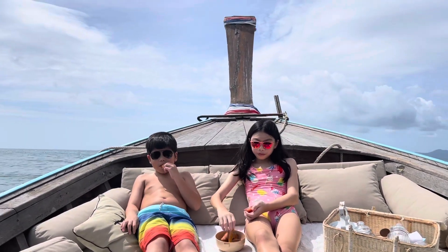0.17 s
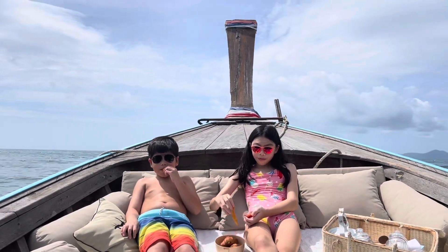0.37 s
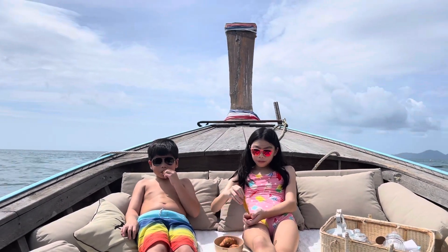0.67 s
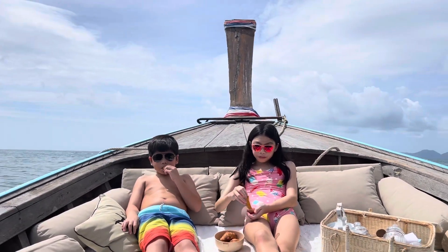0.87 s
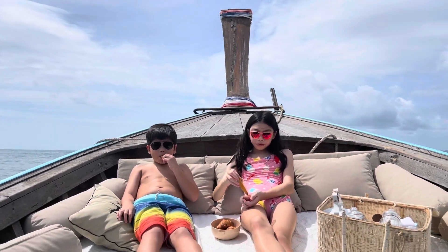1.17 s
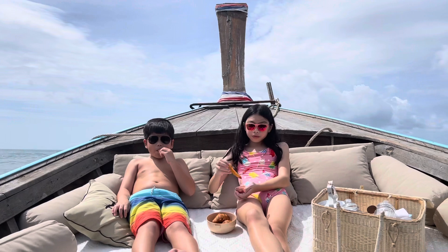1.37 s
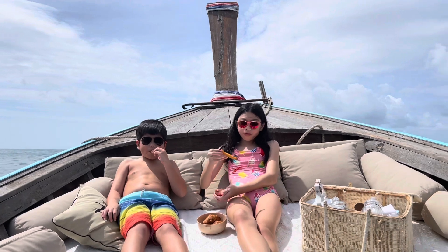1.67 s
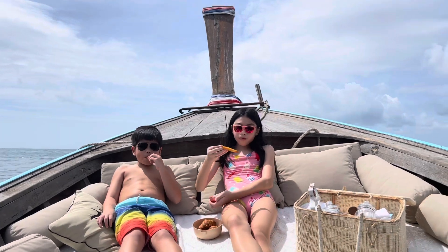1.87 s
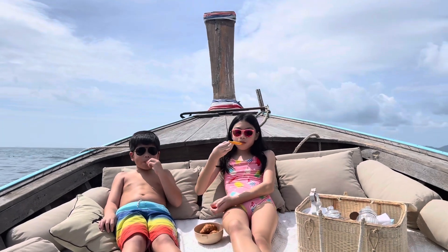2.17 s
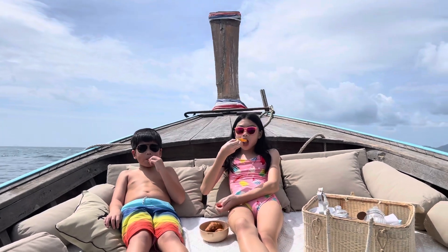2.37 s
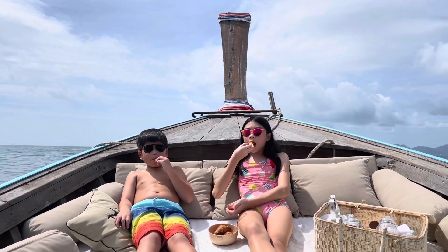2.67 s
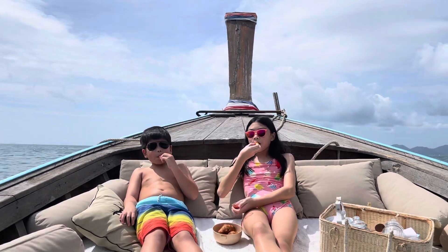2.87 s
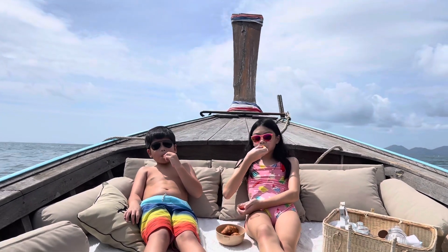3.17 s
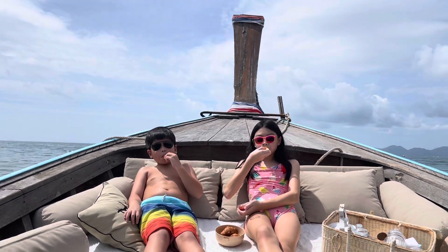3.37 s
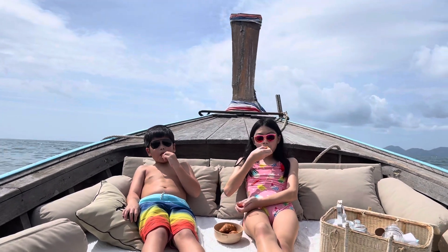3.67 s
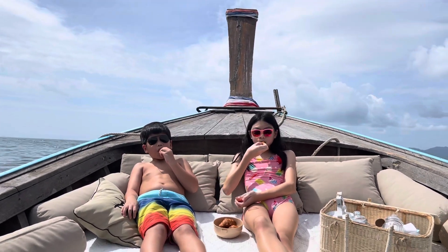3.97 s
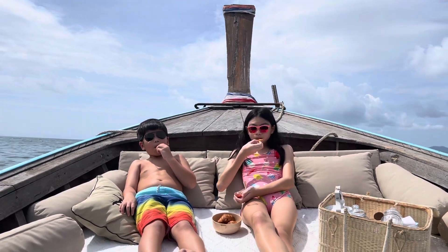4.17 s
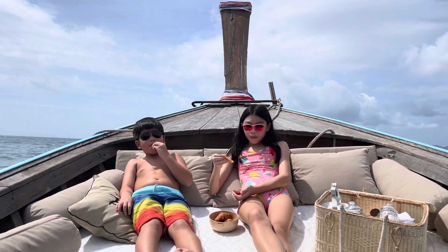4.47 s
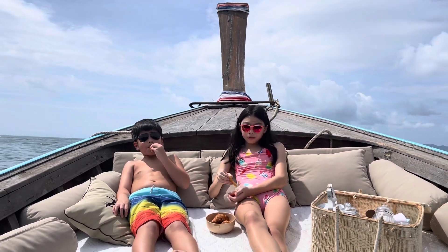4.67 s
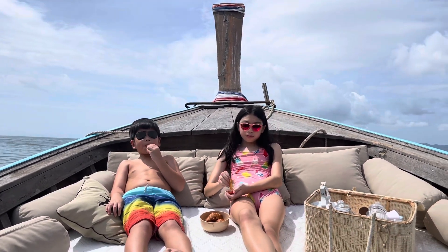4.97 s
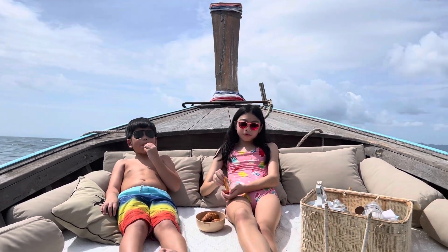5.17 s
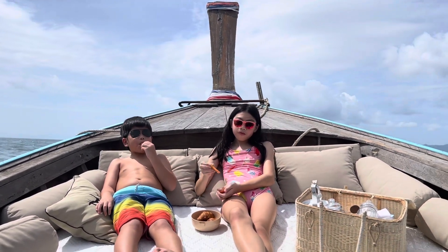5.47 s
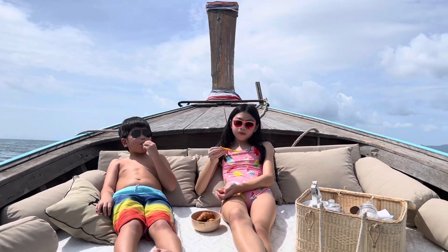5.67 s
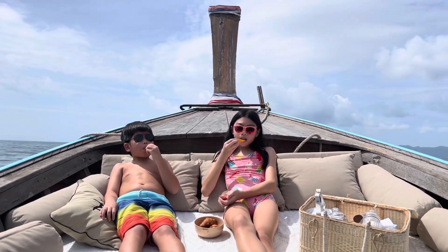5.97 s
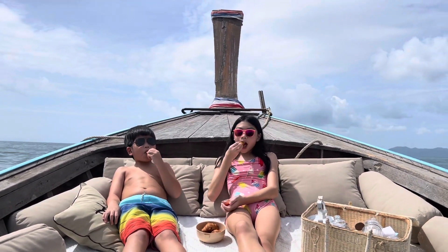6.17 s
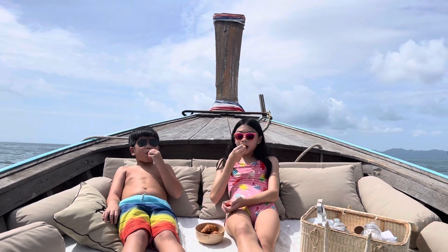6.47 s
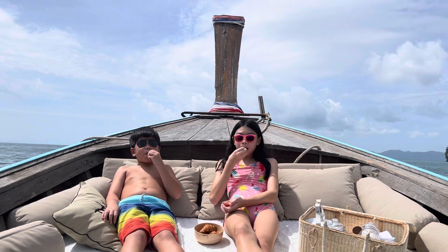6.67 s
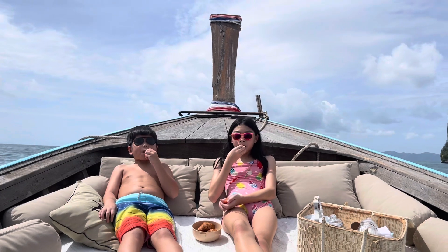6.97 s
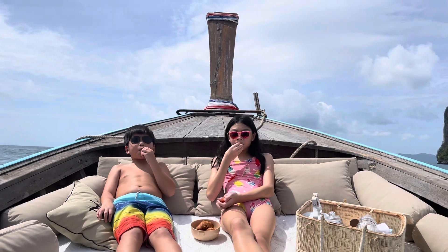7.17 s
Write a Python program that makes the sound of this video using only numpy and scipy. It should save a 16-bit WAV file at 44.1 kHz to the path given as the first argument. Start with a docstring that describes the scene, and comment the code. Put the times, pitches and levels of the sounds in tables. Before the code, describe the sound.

A diesel boat engine drones and clatters steadily while wind buffets the microphone, water slaps and knocks the wooden hull, and a thin whistle rises and sinks.

```python
"""A long-tail boat cruises over open water, heard from near the bow by two microphone ports.
Throughout, wind noise buffets in lumps, droplet hiss swells at the bow, and a four-cylinder diesel gives
shaft-locked tones, noisy clatter, ringing fittings, a gear whine and a rough turbocharger whistle.
In the first second and a half damped knocks and noisy slaps crowd the hull; they return from about 3 to 5 s.
The whistle and shaft climb to a peak just after 5 s, then both sink to the end, with one last knock near 7 s."""
import sys
import numpy as np
from scipy import signal
from scipy.fft import rfft, irfft
from scipy.io import wavfile
from scipy.ndimage import uniform_filter1d

SR = 44100
rng = np.random.default_rng(int(sys.argv[2]) if len(sys.argv) > 2 else 0)


def to_wav(s):
    """Save 16-bit WAV."""
    ch = np.atleast_2d(s).T  # columns
    pcm = np.round(np.clip(ch, -1, 1) * 32767)  # PCM
    wavfile.write(sys.argv[1], SR, pcm.astype(np.int16))


N = 323253
T, FREQS = np.arange(N) / SR, np.fft.rfftfreq(N, 1 / SR)

# Levels are set before each layer's own trim; colours are relative, per Hz.
# head wind: start_s, level_db, left_minus_right_db
BREEZE_CURVE = [(0, -18.5, -1), (1.6, -18, 0), (1.88, -19, 0.5), (2.2, -20, -2), (3.15, -18.5, -0.5),
                (3.5, -19, 1), (3.95, -22.5, -1), (4.6, -19.5, 1.5), (5.1, -22.5, 1), (5.55, -25, 0),
                (6.1, -20.5, 0), (6.7, -26.5, -2), (7.33, -17.5, -1)]
# gusts on top of the breeze: peak_s, lift_db, length_s
WIND_GUSTS = [(0.52, 4, 0.1), (1.09, 1.5, 0.051), (1.22, 3.5, 0.23), (2.72, 1.5, 0.14), (3.335, 2, 0.058),
              (4.17, 5, 0.12), (4.33, 4, 0.12), (4.86, 4, 0.22), (6.01, 2, 0.087), (7.213, 3, 0.22)]
# wind colour: pitch_hz, level_db
WIND_COLOUR = [(15, -35), (27, -39), (38, -8), (65, 3), (110, -4), (170, -3.5), (250, -9), (400, -18),
               (700, -24.5), (1200, -34.5), (3000, -56), (9000, -85)]
# wind between the ports: pitch_hz, likeness_0_to_1, left_lead_rad, left_minus_right_db
WIND_STEREO = [(50, 0.43, 0, -0.45), (128, 0.026, 0.01, -0.33), (300, 0.015, 0.013, -0.61),
               (597, 0.021, 0, 0.87)]
# the bow cuts a wave: peak_s, level_db, swell_and_fade_s
BOW_SPLASHES = [(.03, -45.5, 0.33), (.29, -45, 0.28), (.9, -45, 0.14), (1.3, -40, 0.22), (1.53, -43.5, .1),
                (2.82, -38.5, 0.17), (5.48, -45, 0.37), (6.58, -49.5, 0.19), (6.94, -47, .03),
                (7.3, -45, 0.11)]
# spray colour: pitch_hz, level_db
SPRAY_COLOUR = [(300, -10), (1500, 1), (3000, 2), (4500, .5), (6500, -1), (8000, -.7), (9700, 2.3),
                (11200, 1), (11800, -3.5), (12700, -13)]
# stereo spread of the spray hiss, nearly alike left and right in the top treble, its phase turning
# with pitch: pitch_hz, likeness_0_to_1, left_lead_rad, left_minus_right_db
SPRAY_SPREAD = [(1000, .3, .5, 0), (4000, .3, .6, 1.7), (5000, .15, 1.5, 2), (6600, .4, 0, 3),
                (7400, .45, .9, 2.6), (8400, .95, 0, 0), (8850, .9, -.2, 0), (9750, .97, -2.6, 0),
                (10400, .97, -3.4, 0), (11200, .9, -5.1, 0), (12000, .97, -6.2, 0)]
# water churns along the hull: peak_s, level_db, length_s
HULL_CHURNS = [(0.096, -37.5, 0.3), (0.517, -32, 0.09), (0.666, -26.5, 0.085), (.755, -27, 0.039),
               (0.82, -32, 0.036), (0.925, -31, 0.037), (1.225, -32, 0.17), (2.256, -30, 0.11),
               (2.986, -30.5, 0.32), (3.336, -36, 0.12), (4.326, -26, .09), (4.84, -37, 0.11),
               (5.4, -38, 0.73)]
# churn colour: pitch_hz, level_db
CHURN_COLOUR = [(150, -24), (330, -1), (560, 6.5), (850, 4), (1200, -9), (2500, -35)]
# wave knocks on the hull: start_s, peak_db, pitch_hz, fall_by_60_db_s
HULL_KNOCKS = [(0.369, -10.5, 364, 0.084), (0.419, -7.5, 162, 0.055), (0.453, -12, 293, 0.074),
               (.486, -17, 395, 0.036), (0.503, -22, 260, 0.028), (0.531, -5, 150, .035),
               (0.645, -8.5, 145, .035), (.666, -14, 460, 0.03), (0.737, -7.5, 277, 0.04),
               (0.797, -9, 262, 0.094), (.903, -7.5, 215.5, 0.036), (1.085, -5, 134, .04),
               (1.133, -10, 674, 0.024), (1.138, -2.5, 370, 0.03), (1.192, -12, 503, 0.026),
               (1.2, -5.5, 200, 0.05), (1.229, -8, 600, 0.011), (1.244, 0.5, 123, 0.067),
               (1.271, -12, 526, 0.021), (1.304, -6, 170, 0.027), (1.934, -9, 151, 0.03),
               (3.118, -5, 95, 0.04), (3.225, -6, 169, .022), (3.307, -3.5, 136, 0.064),
               (3.338, -4.5, 187, 0.022), (3.536, -3.5, 134, 0.029), (3.562, -9, 165, 0.017),
               (3.593, -4, 189, 0.025), (3.629, -6, 246, 0.018), (3.637, -2, 129, 0.031),
               (3.666, -3, 88.2, 0.043), (4.171, -3, 104, 0.059), (4.229, -4, 159, 0.024),
               (4.266, -4, 130, .022), (4.314, -16, 500, 0.035), (4.32, -6, 287, 0.042),
               (4.335, -2, 125, 0.025), (4.382, -8, 135, 0.03), (4.723, -5.5, 190, 0.026),
               (4.793, -2.5, 135, 0.051), (4.818, -6, 268, 0.042), (4.897, -9, 94, 0.078),
               (7.05, -10.5, 298, 0.03)]
# one tiny bright tick: start_s, peak_db, pitch_hz, fall_by_60_db_s
BRIGHT_TICK = (4.705, -22.5, 12000, .002)
# turbocharger, spooling more slowly than the shaft: start_s, pitch_hz, level_db, tone_against_hiss_0_to_1
TURBO_CURVE = [(0, 5290, -52, .4), (.26, 5240, -48, .6), (.48, 5440, -42.5, 0.6), (.68, 5460, -43, .55),
               (.9, 5470, -52.5, .3), (1.4, 5450, -51, .2), (1.8, 5400, -49, 0.72), (2.2, 5640, -48, .15),
               (2.6, 5720, -49, .15), (3.5, 5700, -48, 0.15), (4.05, 5780, -47, 0.35),
               (4.45, 5800, -40, 0.6), (4.78, 5880, -44, .3), (5.0, 5960, -39.5, 0.6),
               (5.35, 5880, -39, 0.58), (5.6, 5830, -41.5, .45), (5.95, 5600, -52, .1),
               (6.3, 5450, -46, .15), (6.5, 5400, -45, .8), (6.78, 5410, -43, .9), (7.0, 5360, -51, 0.23),
               (7.15, 5200, -46, .6), (7.33, 5120, -50, .5)]
# steady engine clatter: start_s, level_db
CLATTER_CURVE = [(0, -25.5), (1.3, -25), (1.9, -26), (2.7, -25.5), (3.2, -27), (4.9, -24.5), (5.9, -26),
                 (6.6, -25.5), (7.0, -27.5), (7.33, -25.5)]
# brief clatter surges: peak_s, lift_db, length_s
CLATTER_SURGES = [(.49, 1, 0.059), (.8, 1, 0.075), (1.39, 2, 0.076), (1.985, 2.5, 0.048), (2.81, 2, 0.078),
                  (5.99, 1.5, 0.058)]
# clatter colour: pitch_hz, level_db
CLATTER_COLOUR = [(25, -30), (45, 9.5), (110, 9.5), (200, 4.5), (350, -0.5), (430, -2.5), (900, -4),
                  (1080, -1), (1600, -4.5), (2200, -8), (2800, -11.5), (3700, -22.5), (6500, -23),
                  (9000, -51)]
# resonances of engine block and hull: pitch_hz, width_hz, lift_db
BODY_RESONANCES = [(255, 26, 8.5), (353, 30, 8), (589.5, 31, 6.5), (782, 26, 6.5), (1036, 24, 6),
                   (1115, 17, 6.5), (1330, 24, 1), (1500, 120, 3), (1624, 52, 5), (1895, 52, 4.5),
                   (2060, 50, 0.5)]
# engine between the ports: pitch_hz, likeness_0_to_1, left_lead_rad, left_minus_right_db
ENGINE_STEREO = [(60, 0.82, 0.58, 5), (265, 0.94, 0.1, -3), (454, 0.16, -0.061, 1.5), (800, 0.73, 1.51, -2),
                 (1140, 0.94, 0.86, -1.5), (1720, 0.44, 0.25, -4), (2600, 0.22, 0.87, -2.5),
                 (2880, 0.84, 2.2, 1), (3740, 0.23, -0.46, 2), (6000, 0.9, 1.45, 3.5)]
# the propeller slows and frees itself with the swell: start_s, shaft_hz, firing_tone_db, octave_db
SHAFT_CURVE = [(0, 35.91, -43, -26.5), (.31, 36.77, -19, -32.5), (.85, 38.67, -37, -25.5),
               (1.25, 38.31, -20, -26), (1.53, 37.97, -34, -29), (1.93, 37.15, -14.5, -32.5),
               (2.2, 39.33, -29, -29.5), (2.68, 39.38, -26, -29.5), (3.0, 38.2, -29, -25.5),
               (3.4, 37.94, -23, -25), (3.7, 38.32, -19.5, -27), (4.1, 38.8, -23, -22),
               (4.6, 39.17, -23.5, -28.5), (5.2, 40.46, -25, -30.5), (5.5, 39.86, -25, -27),
               (5.83, 37.71, -27.5, -25), (6.08, 37.19, -20, -28), (6.65, 36.85, -17, -25),
               (7.02, 36.01, -20.5, -27.5), (7.33, 35.5, -15.5, -25.5)]
# exhaust tones swept through hull resonances: shaft_multiple, level_db, resonance_hz, width_hz, lift_db
RESONANT_ORDERS = [(1, -40.5, 39.6, 2.2, 11), (3, -42.5, 119, 12, 17.5), (5, -37, 201, 9.3, 7),
                   (6, -43, 242, 8, 12.5), (7, -45, 260, 17, 12.5)]
# weaker exhaust tones: shaft_multiple, level_db
WEAK_ORDERS = [(2.5, -31), (3.5, -38), (4.5, -39), (5.5, -47), (6.5, -40.5), (7.5, -49.5), (8.5, -49),
               (9, -52), (9.5, -49)]

SPRAY_BETWEEN_DB = -49  # sheets between splashes, before the spray trim
KNOCK_RISE_CYCLES, KNOCK_LEAD_RAD, HULL_TRIM_DB = .36, 1.3, -3
# loose fittings: pitch range, taps a second for each, time to fall by 60 dB
FITTING_LOW_HZ, FITTING_HIGH_HZ, FITTING_TAPS_PER_S, FITTING_RING_S = 720, 2300, 5, .06
FITTINGS_DB, FITTING_LAG_TURNS = -37, .65
FIRING_ORDER = 2  # firings per turn of the shaft
EDGE_HZ = 12750  # upper band limit


def amp(db):
    """Decibels to gain."""
    return 10 ** (np.asarray(db) / 20)


def unit(x):
    """Scales to rms 1, over both channels together."""
    return x / np.sqrt(np.mean(x ** 2) + 1e-20)


def over_time(rows):
    """Each column of a curve table at every sample."""
    s, *columns = np.transpose(rows)
    return [np.interp(T, s, column) for column in columns]


def over_pitch(rows):
    """Each column of a spectrum table at every frequency, on a log pitch scale."""
    hz, *columns = np.transpose(rows)
    return [np.interp(np.log(FREQS + 1), np.log(hz + 1), column) for column in columns]


def swell_shape(s, length):
    """A rounded swell, down to 1/e at half its length to either side."""
    return np.exp(-(2 * (T - s) / length) ** 2)


def swells_db(rows):
    """The summed lift of a table of short, rounded swells."""
    return sum(db * swell_shape(s, length) for s, db, length in rows)


def bell(offset, width):
    """The shape of a resonance: 1 at its centre, a half at half its width to either side."""
    return 1 / (1 + (2 * offset / width) ** 2)


def body_db():
    """The lift that block and hull give each frequency."""
    return sum(db * bell(FREQS - hz, width) for hz, width, db in BODY_RESONANCES)


def drift(hz):
    """Random wander of rms 1, mostly slower than about hz."""
    return unit(irfft(rfft(rng.standard_normal(N)) / (1 + (FREQS / hz) ** 4), N))


def above(x, hz):
    """The part of x above hz, with a soft edge."""
    return irfft(rfft(x) * (1 - 1 / (1 + (FREQS / hz) ** 4)), N)


def stereo_noise(colour_db, spread, source=None):
    """Coloured noise, partly alike left and right, with a phase lead and a level tilt."""
    alike, lead, tilt_db = over_pitch(spread)
    alike = np.clip(alike, 0, 1)
    if source is None:
        source = rng.standard_normal((2, N))
    left, other = rfft(source)
    right = (alike * left + np.sqrt(1 - alike ** 2) * other) * np.exp(-1j * lead)
    pair = np.array([left * amp(tilt_db / 2), right * amp(-tilt_db / 2)])
    return unit(irfft(pair * amp(colour_db), N))


def swirl(x, patchy_db):
    """Moving air lifts and sinks patches of about 100 Hz by 100 ms."""
    z = signal.stft(x, nperseg=2048, noverlap=1536)[2]
    patches = rng.standard_normal(z.shape[1:])
    patches = uniform_filter1d(patches, size=5, axis=0)  # across pitch
    patches = unit(uniform_filter1d(patches, size=10, axis=1))  # across time
    moved = signal.istft(z * amp(patchy_db * patches), nperseg=2048, noverlap=1536)[1]
    return unit(moved[:, :N])


def throb(turns, depth, decay):
    """A gain that jumps at each whole turn and dies away within it."""
    return unit(1 + depth * np.exp(-(turns % 1) / decay))


def whistle(hz, width_hz):
    """A fuzzy line along a pitch curve, different at each port."""
    spin = np.exp(2j * np.pi * np.cumsum(hz) / SR)
    return np.array([unit(((drift(width_hz) + 1j * drift(width_hz)) * spin).real) for _ in range(2)])


def wind(gust_brightening=0.54, lumpy_db=2.05):
    """Eddies hit each port in lumps; stronger gusts also reach higher in pitch."""
    breeze_db, side_db = over_time(BREEZE_CURVE)
    gust_db = breeze_db + swells_db(WIND_GUSTS)
    noise = stereo_noise(over_pitch(WIND_COLOUR)[0], WIND_STEREO)
    shared, separate = drift(20.0), np.array([drift(54), drift(23)])
    eddies_db = lumpy_db * (shared + separate) / np.sqrt(2)
    bright_db = gust_brightening * (gust_db - gust_db.mean() + eddies_db)
    noise = noise + (amp(bright_db) - 1) * above(noise, 240)
    balance_db = np.array([side_db, -side_db]) / 2
    return amp(gust_db - 1.0 + balance_db) * unit(noise * amp(eddies_db))


def spray(fizz_db=1.03, trim_db=5.5, wash_db=-47):
    """Sheets of droplets swell as the bow cuts each wave, over the even wash along the hull."""
    power = amp(SPRAY_BETWEEN_DB) ** 2
    for s, db, fade in BOW_SPLASHES:
        power = power + (amp(db) * np.exp(-abs((T - s) / fade))) ** 2
    colour_db, = over_pitch(SPRAY_COLOUR)
    sheets = stereo_noise(colour_db, SPRAY_SPREAD) * np.sqrt(power)
    sheets = sheets * amp(trim_db + fizz_db * drift(150))  # fast fizzing
    return sheets + amp(wash_db) * stereo_noise(colour_db, SPRAY_SPREAD)


def churn():
    """Short gurgling slaps in the middle register where a wave folds against the planks."""
    level = sum(amp(db) * swell_shape(s, length) for s, db, length in HULL_CHURNS)
    return level * swirl(stereo_noise(over_pitch(CHURN_COLOUR)[0], ENGINE_STEREO), patchy_db=2.5)


def knock(s, db, hz, ring):
    """A soft-edged blow makes a damped tone, a little ahead in phase at one port."""
    t = np.maximum(T - s, 0)
    now = (t > 0) & (t < 2 * ring)
    t, out = t[now], np.zeros((2, N))
    shape = (1 - np.exp(-(t * hz / KNOCK_RISE_CYCLES) ** 2)) * amp(-60 * t / ring)
    shape = shape / (shape.max(initial=0) + 1e-12)
    lead = rng.uniform(-KNOCK_LEAD_RAD, KNOCK_LEAD_RAD) * np.array([[1], [-1]]) / 2
    out[:, now] = amp(db) * shape * np.sin(2 * np.pi * hz * t + lead)
    return out


def gears(shaft_hz, teeth=76, level_db=-53):
    """A faint gear whine at the tooth rate rises and falls with the shaft."""
    return amp(level_db + drift(0.52)) * whistle(teeth * shaft_hz, 24) * amp([[1.5], [-2]])


def turbo(turns, skirt_rise_hz=75, wobble_hz=22):
    """A whistle inside a wide hiss that the exhaust pulses pump; louder on the left."""
    hz, db, purity = over_time(TURBO_CURVE)
    wobbling_hz = np.array([hz + wobble_hz * drift(45) for _ in range(2)])
    core = unit(np.sin(2 * np.pi * np.cumsum(wobbling_hz, axis=1) / SR))
    pumping = throb(turns, depth=1.2, decay=.22)
    skirt = whistle(hz + skirt_rise_hz, 245) * pumping
    return amp(db) * (purity * core + skirt) / np.hypot(purity, 1) * amp([[2], [-5.5]])


def fittings(turns, count=40):
    """Loose metal parts, jolted in the early part of a shaft turn, ring briefly at their own pitches."""
    t = np.arange(round(FITTING_RING_S * SR)) / SR
    out = np.zeros((2, N + len(t)))
    colour_db = over_pitch(CLATTER_COLOUR)[0] + body_db()
    pitches = np.linspace(FITTING_LOW_HZ, FITTING_HIGH_HZ, count) + rng.normal(0, 9.9, count)
    for hz in pitches:
        lead = np.array([[0], [rng.normal(0.5, 0.9)]])  # left port against right, in radians
        fall = amp(np.interp(hz, FREQS, colour_db) - 60 * t / FITTING_RING_S)
        ring = fall * (1 - np.exp(-t * hz / 2))
        tap = ring * np.sin(2 * np.pi * hz * t - lead)
        which, late = rng.random((2, round(FITTING_TAPS_PER_S * T[-1])))
        tap_turns = np.floor(which * turns[-1]) + FITTING_LAG_TURNS * late
        for at in np.searchsorted(turns, tap_turns):
            out[:, at:at + len(t)] += rng.uniform(0.54, 1) * tap
    return amp(FITTINGS_DB) * unit(out[:, :N]) * amp([[1], [-1]])


def clatter(turns, repeating=0.7, rattle_db=0.9):
    """Combustion and valve noise ring the block; part of it repeats every two turns of the shaft."""
    load_db, = over_time(CLATTER_CURVE)
    cycle = np.linspace(0, 1, round(2 * SR * T[-1] / turns[-1]))
    rows = rng.standard_normal((2, N))[:, :len(cycle)]
    pattern = np.array([np.interp(turns / 2 % 1, cycle, row) for row in rows])
    source = repeating * above(pattern, 344) + rng.standard_normal((2, N))
    colour_db = over_pitch(CLATTER_COLOUR)[0] + body_db()
    noise = swirl(stereo_noise(colour_db, ENGINE_STEREO, source), patchy_db=1.9)
    noise = noise + (amp(rattle_db * drift(22)) - 1) * above(noise, 1400)  # the bright edge rattles in fits
    # each turn starts with a burst, and every second one hits harder
    beat = throb(turns, depth=.33, decay=.35) * throb(turns / 2, depth=.2, decay=.35)
    return amp(load_db + swells_db(CLATTER_SURGES)) * noise * beat


def exhaust_tone(multiple, unsteady, turns, flutter=.14):
    """One shaft-locked tone that wavers in the wind and flutters with uneven firing."""
    knots = np.arange(0, T[-1] + 1, 1 / 5)
    waver = rng.standard_normal((len(knots), 2)) @ [1, 1j]
    fading = np.interp(T, knots, 1 + unsteady * waver)
    cycles = np.arange(0, turns[-1] + 2, 2)  # one knot every two turns
    uneven = rng.standard_normal((len(cycles), 2)) @ [1, 1j]
    fading = fading + flutter * np.interp(turns, cycles, uneven)
    return unit((fading * np.exp(2j * np.pi * (multiple * turns + rng.random()))).real)


def drone(shaft_hz, firing_db, octave_db, turns, overtone_db=-1.0, overtone_lead=0.57, labour_db_per_hz=0.35):
    """Exhaust tones locked to the shaft slide through the hull's resonances."""
    waver, waver_per_order, overtone_waver = .2, .05, .42
    low = amp(firing_db - 1.5) * exhaust_tone(FIRING_ORDER, waver, turns)
    middle = amp(octave_db) * exhaust_tone(2 * FIRING_ORDER, waver, turns)
    for k, db, hz, width, lift_db in RESONANT_ORDERS:
        k = round(k)
        resonance_db = lift_db * bell(k * shaft_hz - hz, width)
        middle = middle + amp(db + resonance_db) * exhaust_tone(k, waver_per_order * k, turns)
    high = sum(amp(db) * exhaust_tone(round(2 * k) / 2, overtone_waver, turns) for k, db in WEAK_ORDERS)
    # the overtones swell together as the engine labours
    high = high * amp(overtone_db + labour_db_per_hz * (shaft_hz.mean() - shaft_hz))
    ports = np.array([[1], [np.exp(-1j * overtone_lead)]])  # the left port leads, in radians
    upper = irfft((rfft(middle) + rfft(high) * amp(body_db())) * ports, N)
    return low * amp([[-.3], [.3]]) + upper * amp([[-.8], [.8]])


def scene():
    """Wind and water lie around the engine layers, which share one shaft; the turbo keeps its own pitch."""
    shaft_hz, firing_db, octave_db = over_time(SHAFT_CURVE)
    turns = np.cumsum(shaft_hz) / SR
    knocks = amp(HULL_TRIM_DB) * sum(knock(*row) for row in HULL_KNOCKS)
    water = spray() + churn() + knocks + knock(*BRIGHT_TICK)
    engine = gears(shaft_hz) + turbo(turns) + fittings(turns) + clatter(turns)
    engine = engine + drone(shaft_hz, firing_db, octave_db, turns)
    return wind() + water + engine


def record(dry):
    """The ports round off the hardest peaks; then a steep low-pass limits the band."""
    knee, headroom = .55, .35
    clean = np.clip(dry, -knee, knee)
    rounded = clean + headroom * np.tanh((dry - clean) / headroom)
    low_pass = signal.firwin(401, EDGE_HZ, window=("kaiser", 9), fs=SR)
    return signal.oaconvolve(rounded, low_pass[None], "same")


dry = scene()
out = record(dry)
to_wav(out)
```